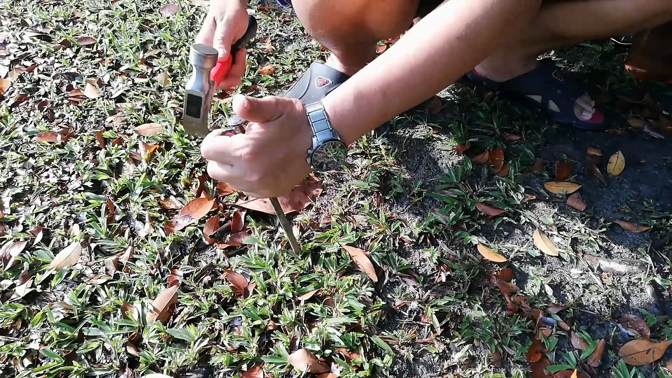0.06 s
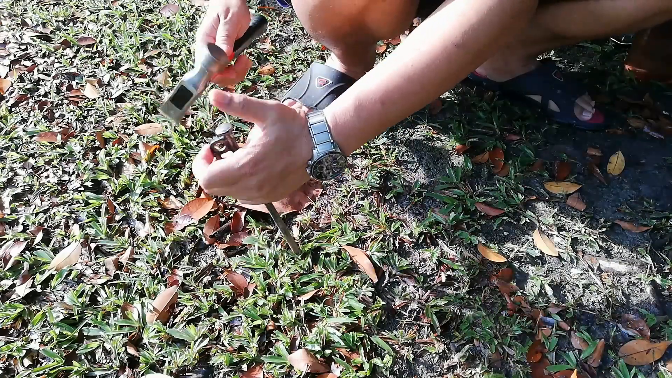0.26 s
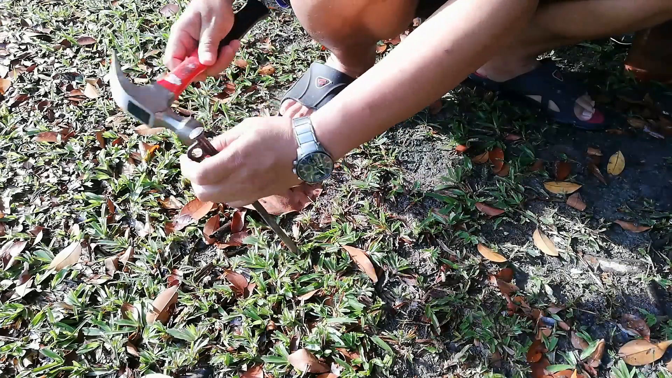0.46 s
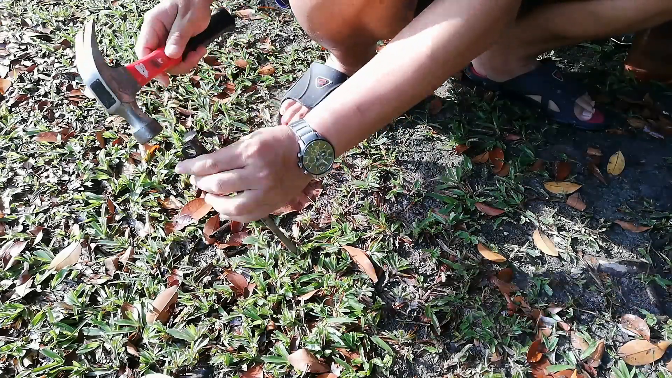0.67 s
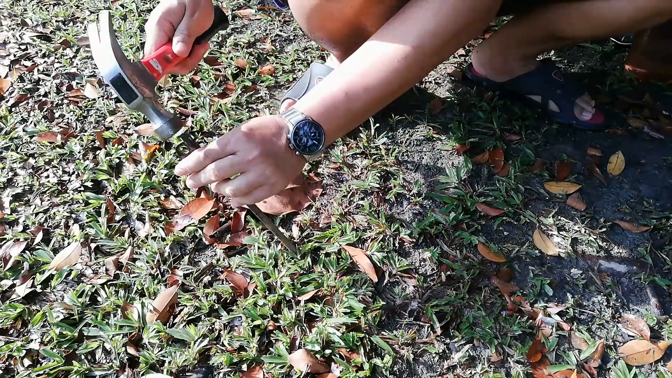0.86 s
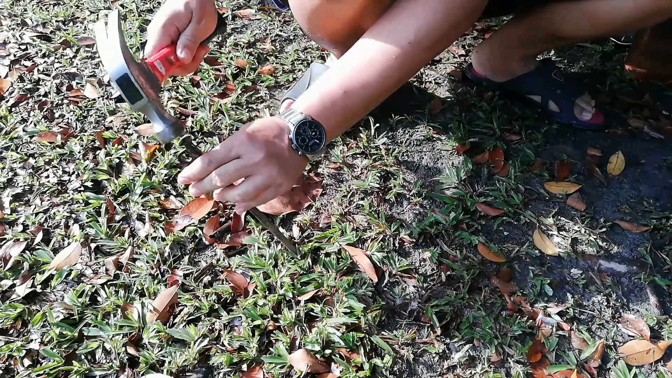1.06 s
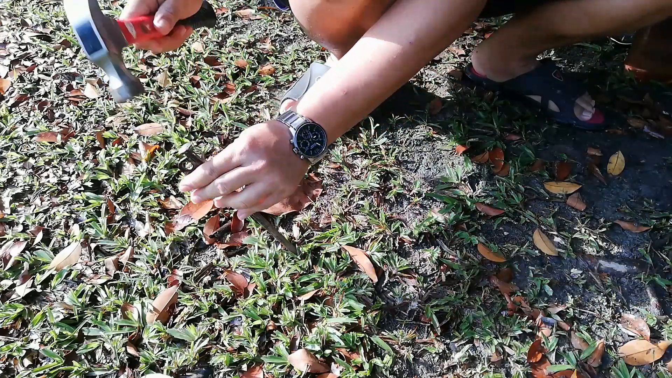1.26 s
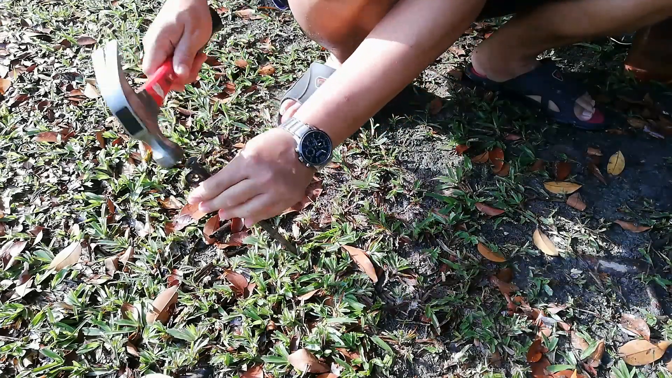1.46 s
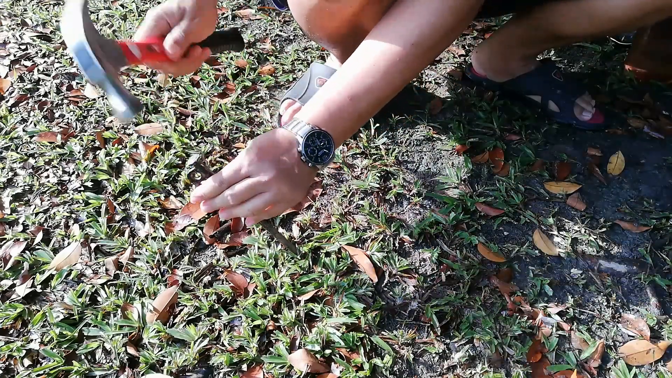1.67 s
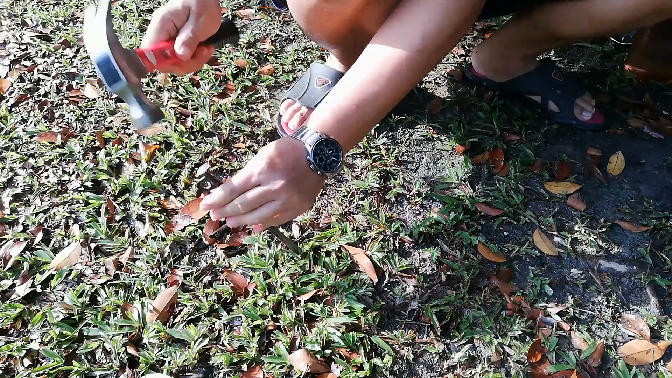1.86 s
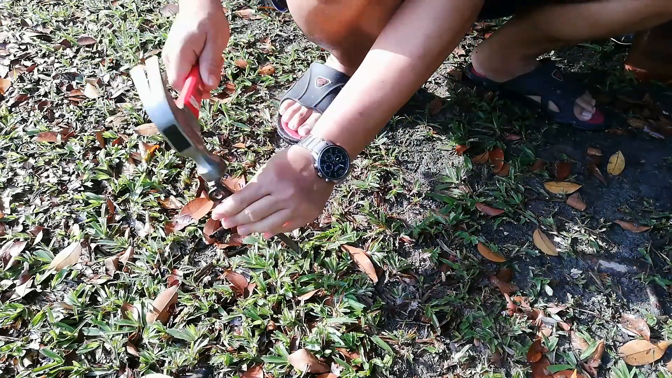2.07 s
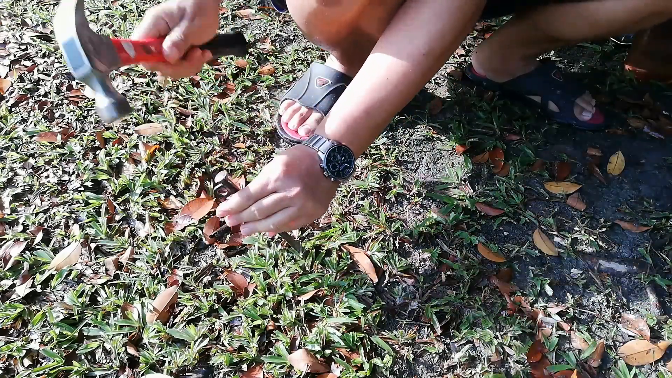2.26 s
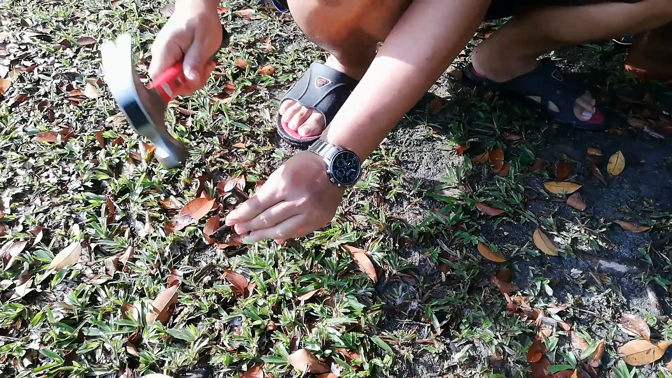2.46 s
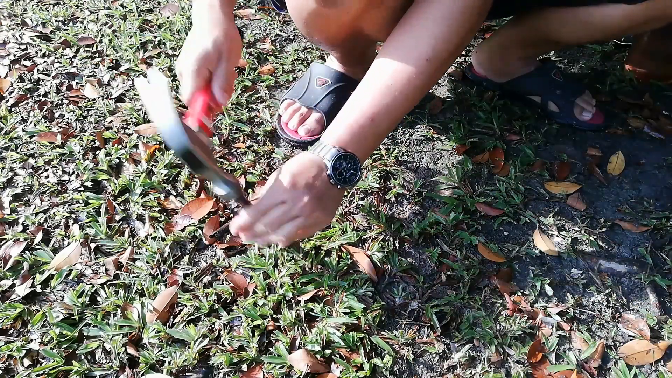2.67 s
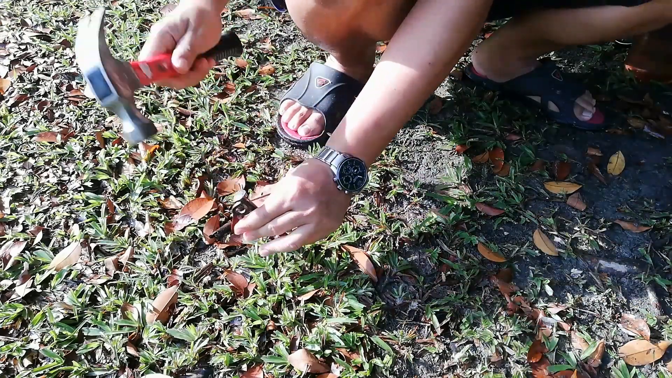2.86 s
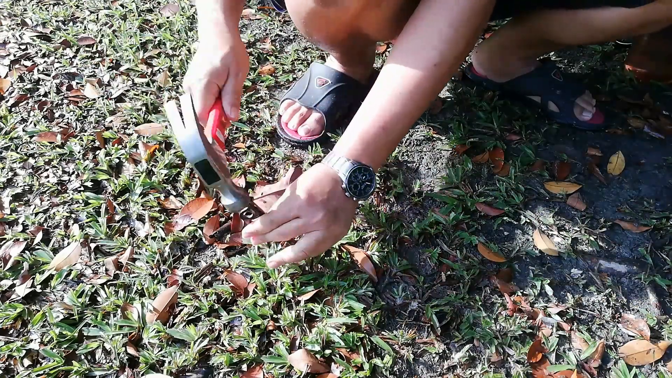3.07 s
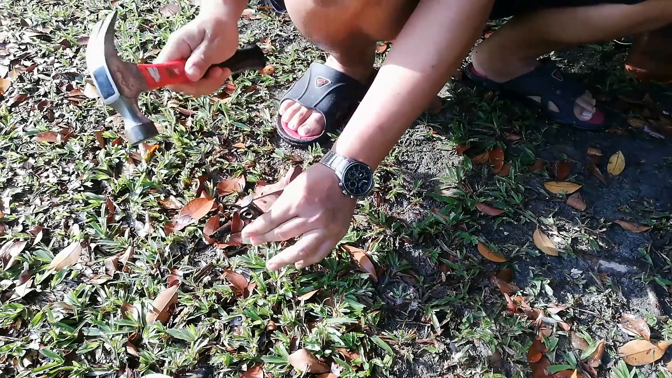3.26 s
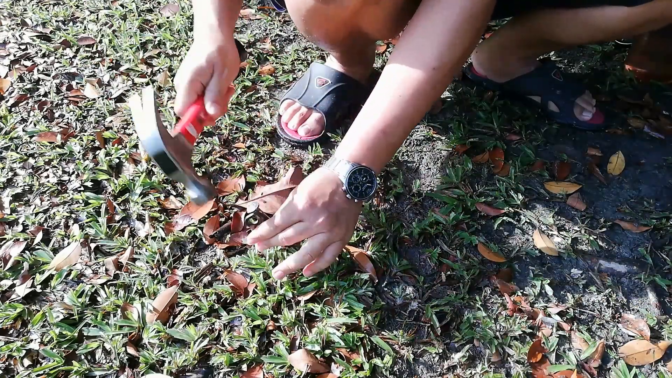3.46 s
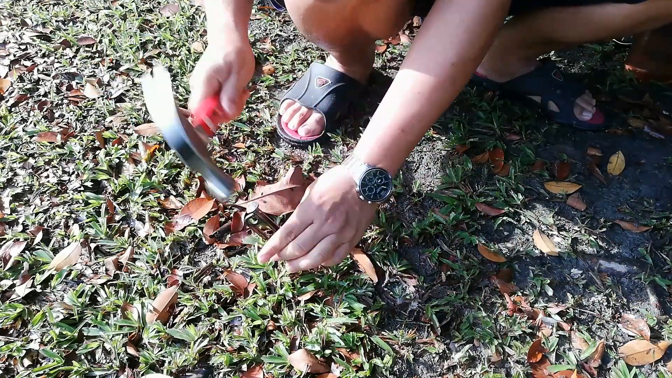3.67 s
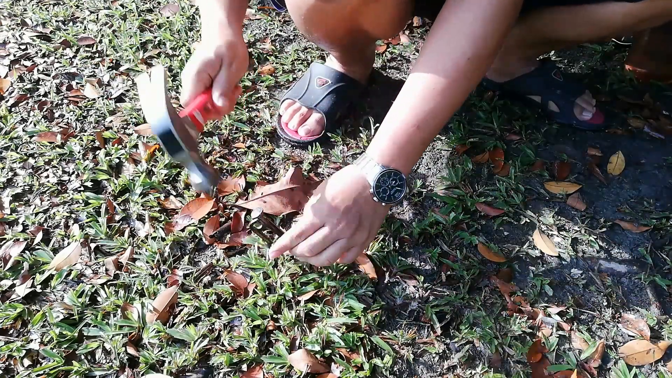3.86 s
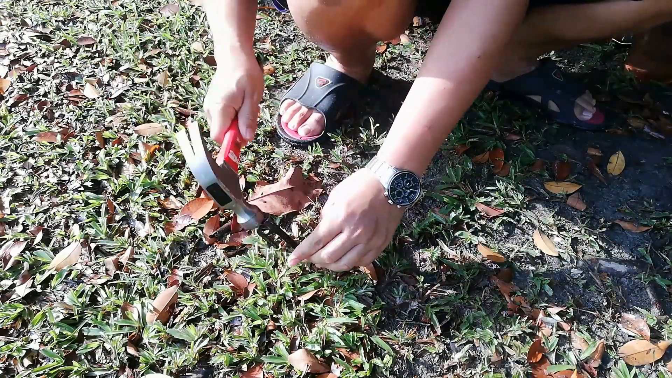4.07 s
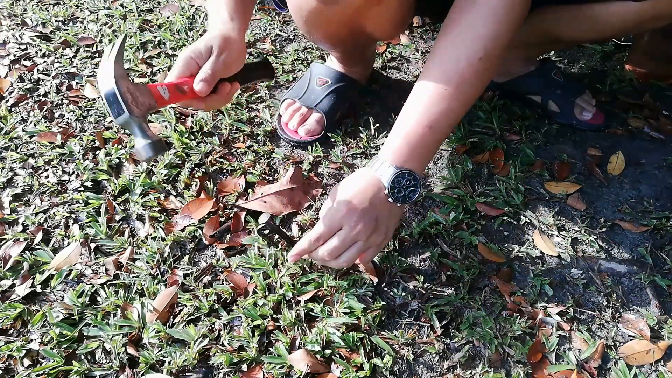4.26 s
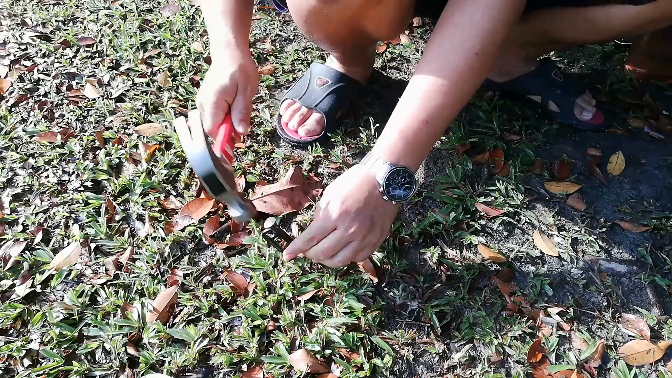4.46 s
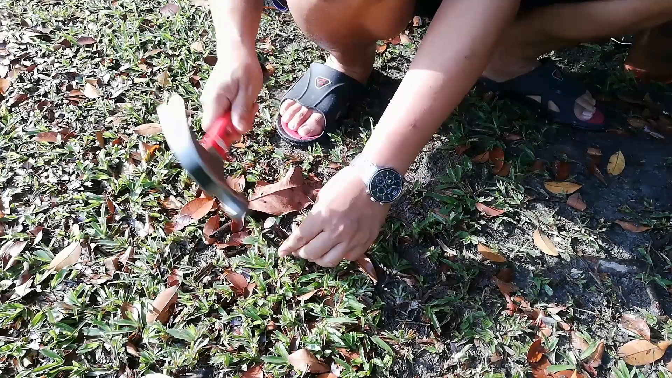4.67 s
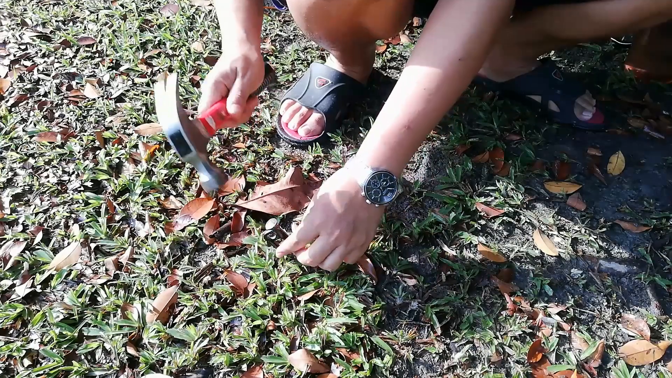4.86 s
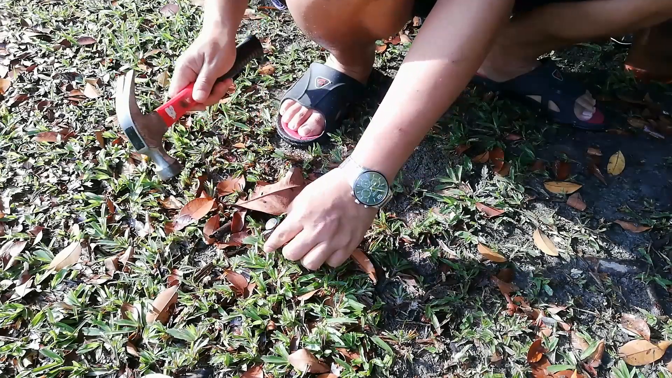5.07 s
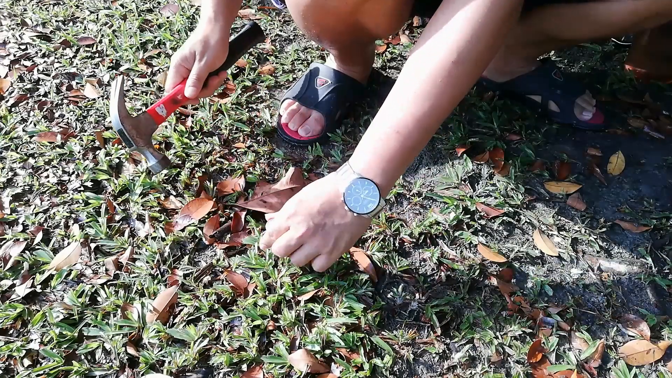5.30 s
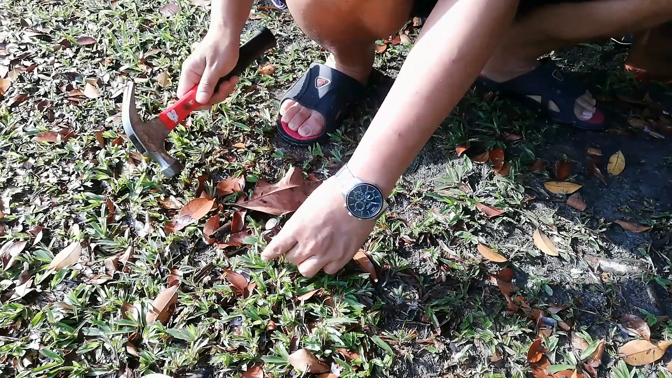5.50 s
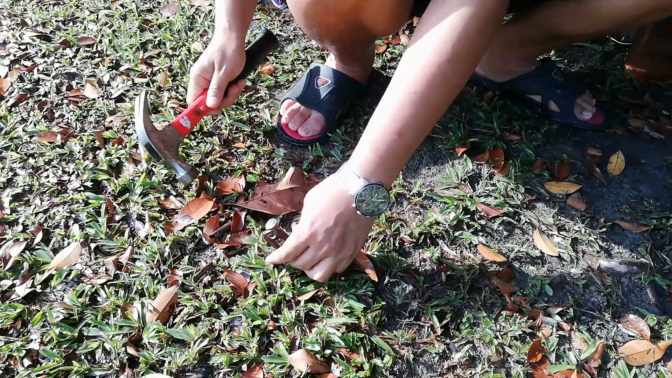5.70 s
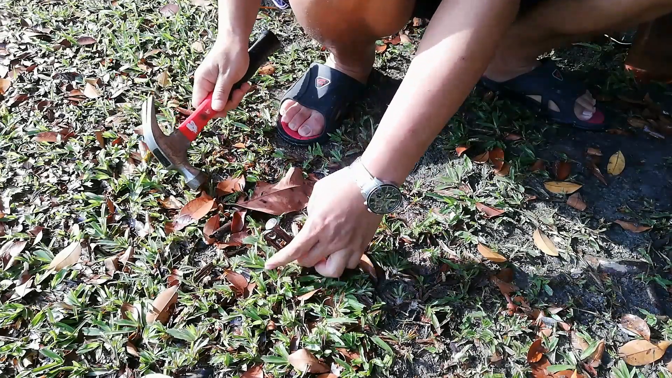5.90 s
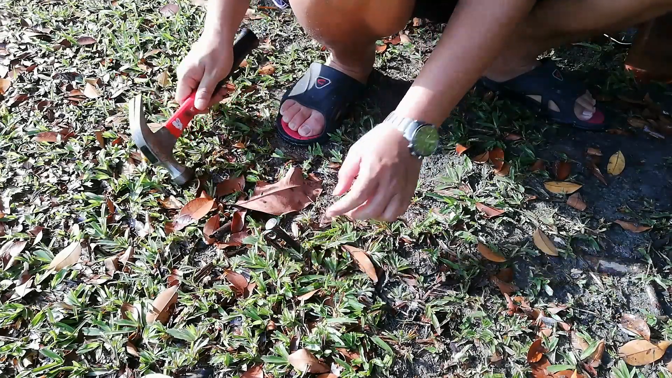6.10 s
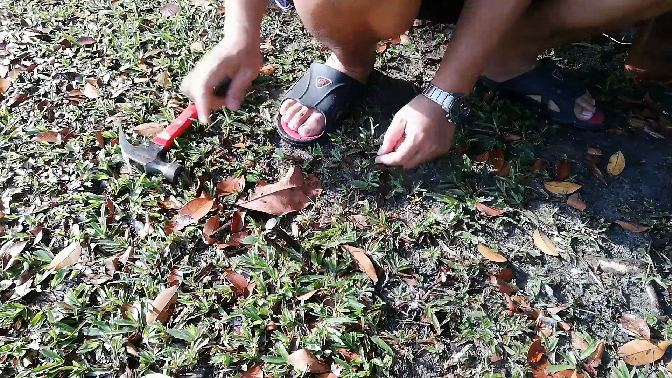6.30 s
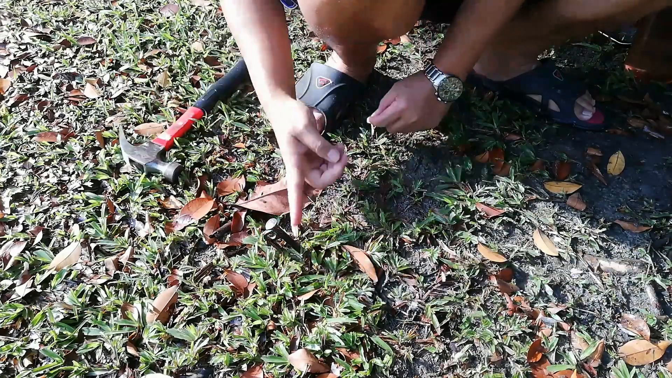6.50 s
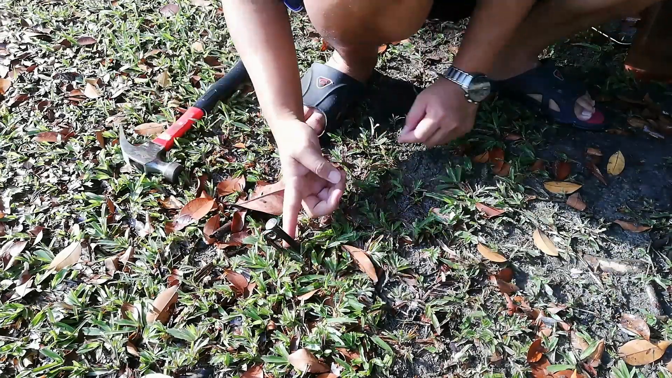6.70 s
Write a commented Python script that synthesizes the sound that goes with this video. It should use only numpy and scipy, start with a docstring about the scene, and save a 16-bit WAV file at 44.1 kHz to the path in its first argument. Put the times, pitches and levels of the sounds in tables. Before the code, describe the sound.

On an open lawn, a faint distant engine hum, soft birds and thin high hiss come first. Close by, a hammer gives a metal stake two light taps, then eleven loud, steady, piercing clinks, each with a short ring and open-air scatter. After a brief pause, the hammer is laid down with a soft dry crackle of grass. Close stereo pickup, with loud hits squashed.

```python
"""Open lawn, heard by two microphones: first a distant engine hums under faint birds and a high hiss of air.
Close by, a claw hammer then drives a thin steel tent stake into the soil: two light taps (a short glide rings
with the first), eleven full blows. Each is a noise crack with decaying sine modes; soil damps the stake, the
hammer head sings on, near ground and far trees scatter the clink, and the camera's limiter ducks loud blows.
Last, the hammer is laid in the grass, a crackle of clumped noise grains."""
import sys
import numpy as np
from scipy import signal
from scipy.fft import rfft, irfft, next_fast_len
from scipy.io import wavfile
from scipy.ndimage import uniform_filter1d, map_coordinates

SR = 44100
rng = np.random.default_rng(int(sys.argv[2]) if len(sys.argv) > 2 else 0)


def transcribe(u):
    """Save the signal u as a 16-bit wav file named by the first command-line argument.

    u: samples, shape (n,) or (channels, n), limited to [-1, 1]; the rate is SR.
    q: integer samples, one column per channel.
    """
    v = np.clip(np.atleast_2d(u).T, -1, 1)
    q = np.round(v * 32767).astype(np.int16)
    wavfile.write(sys.argv[1], SR, q)


N = 297316  # length [samples]

# Close: hammer blows; where the face lands decides what rings:
# (time [s], strength [dB], hammer head relative level [dB], stake's bright modes relative level [dB])
HAMMER_BLOWS = [(0.8876, -19, -7, -20), (1.0737, -12.5, -2, -10), (1.3681, -3, -2.5, -4),
                (1.6771, -1, -4.5, -4.5), (2.0031, 1, 4, -1.5), (2.33, 3.5, -5, 4.5), (2.6701, 1.5, 0, -3),
                (3.016, 0, -18, 2.5), (3.3464, -0.5, 3, 4.5), (3.6798, -0.5, 3, -0.5), (4.0178, -2, 1.5, 6),
                (4.3611, 0, 2.5, 4.5), (4.681, -5, -1.5, 4.5)]
# Steel on steel, spectrum of the crack: (frequency [Hz], relative level [dB])
CRACK_SPECTRUM = [(250, -18.5), (600, -22), (1000, -16.5), (1400, -13), (2700, -12), (4500, -3), (6600, -3),
                  (8200, 1.5), (9900, 3.5), (10800, -7.5), (12200, -9.5), (13300, -17.5), (15300, -7),
                  (16500, -21.5)]
# Stake modes damped by the soil, before its later grip: (frequency [Hz], relative level [dB], t60 [s])
STAKE_MODES = [(3470, -22.5, 0.06), (4300, -7.5, 0.064), (4730, -18.5, 0.036), (5420, -15, 0.0084),
               (7920, -5, 0.049), (8050, -15.5, 0.015), (8434, 0, 0.038), (9850, -3, 0.044),
               (11700, -21, 0.031), (12170, -16.5, 0.05), (13740, -21.5, 0.023)]
# The stake's low bending modes, retuned at every blow: (mean frequency [Hz], relative level [dB], t60 [s])
BENDING_MODES = [(1398, -20.5, 0.078), (1769, -21.5, 0.075), (2295, -21, 0.046)]
# The stake's brightest modes, which carry farthest: (frequency [Hz], relative level [dB], t60 [s])
BRIGHT_MODES = [(5468, 0, 0.04), (7680, 0, 0.05), (9700, -14.5, 0.018)]
# Balance of the clink between the two microphones: (frequency [Hz], left minus right [dB])
CLINK_LEAN = [(2500, 0.5), (4500, 2.5), (8000, 1), (12500, -9.0)]
# Scatter from the ground and plants near by: (frequency [Hz], t60 [s])
NEAR_DECAY = [(300, 0.046), (1500, 0.13), (4000, 0.25), (8000, 0.28), (15000, 0.24)]
# Scatter from trees farther off: (frequency [Hz], t60 [s])
FAR_DECAY = [(5500, 0.59), (7700, 0.61), (10000, 0.3)]
# Hammer settling in the grass: (time [s], level before the soft onset and decay [dB], t60 [s])
GRASS_RUSTLES = [(6.19, -42.5, 0.28), (6.213, -32, 0.14), (6.239, -41, 0.18), (6.281, -51, 1.0)]
# Colour of the grass crackle: (frequency [Hz], relative level [dB])
GRASS_SPECTRUM = [(300, -20), (1200, -7), (2800, 1.5), (4200, -3.5), (6000, -2), (9000, 0), (12000, -4.5),
                  (16000, -10)]
# Short glides: distant bird chirps, but at 0.891 s the stake's short ring near 4.4 kHz at the first light tap:
# (time [s], length [s], start frequency [Hz], end frequency [Hz], relative level [dB])
SHORT_GLIDES = [(.322, 0.028, 4980, 3580, -57), (0.672, 0.045, 4300, 3850, -65),
                (0.789, 0.054, 4110, 4130, -58), (0.891, 0.029, 4550, 4400, -44),
                (0.952, 0.033, 4600, 3440, -54), (4.957, 0.033, 4500, 3300, -59),
                (5.307, 0.027, 3520, 4780, -55.5), (5.494, 0.034, 3600, 4800, -60.5),
                (5.62, 0.033, 4200, 4630, -62)]
# Long far-off trills: (time [s], length [s], centre frequency [Hz], level [dB])
BIRD_TRILLS = [(0, 0.37, 2880, -57.5), (0, 0.4, 2020, -60), (1.384, 0.3, 2910, -59),
               (5.466, 0.45, 3060, -61), (5.551, 0.4, 2600, -63.5)]
# Distant engine's hum lines: (frequency [Hz], level before wavering [dB])
ENGINE_LINES = [(27, -59.5), (54, -57.5), (91.5, -49.5), (183, -57.5), (277, -66)]
# The engine's higher whine: (time [s], level before wavering [dB])
ENGINE_WHINE = [(0, -71), (4.7, -70.5), (5.4, -68.5), (6.74, -62.5)]
# Colour of the low rumble: (frequency [Hz], relative level [dB])
RUMBLE_SPECTRUM = [(15, -5), (30, -1.5), (80, 5), (140, -2), (210, -6.5), (300, -15.5), (450, -18.5),
                   (900, -55)]
# Rumble over time: (time [s], level before wavering [dB])
RUMBLE_COURSE = [(0, -48.5), (2.8, -47), (5.9, -45.5), (6.74, -47)]
# Colour of the light breeze: (frequency [Hz], relative level [dB])
BREEZE_SPECTRUM = [(200, 8), (480, -7.5), (640, 3.5), (1050, 1.5), (1350, 1.5), (1700, -4), (2050, -0.5),
                   (2500, -7), (3100, -4), (4300, -10.5), (6000, -19.5), (9000, -21), (15000, -41)]
# Breeze over time: (time [s], level before wavering [dB])
BREEZE_COURSE = [(0, -49), (3.3, -50.5), (4.6, -47.5), (5.2, -50), (6.25, -45.5), (6.74, -51)]
# Colour of the high, insect-like hiss: (frequency [Hz], relative level [dB])
HISS_SPECTRUM = [(3000, -40), (7600, -21), (8700, -1), (9600, -1), (10500, 5.5), (11200, 2.5), (11700, -9),
                 (12600, -30), (15500, -42)]
# Outdoor noise at the two microphones: (frequency [Hz], left-right likeness [-1 to 1])
OUTDOOR_LIKENESS = [(60, 0.98), (130, 0.92), (290, 0.51), (640, -0.8), (1410, -0.24), (3100, -0.28),
                    (6820, 0.14), (15000, 0.018)]
# Balance of the outdoor noise: (frequency [Hz], left minus right [dB])
OUTDOOR_LEAN = [(200, 0.5), (380, 1), (700, -9.5), (1290, -2), (4400, -1.5), (8120, 0), (15000, -20.5)]

# The hammer head's own clear note
HEAD_HZ, HEAD_DB, HEAD_T60_S = 5816, -19, 0.25
# The crack, and what the surroundings return
CRACK_DB, CRACK_NEAR_DB, STAKE_NEAR_DB, FAR_DB = 1.07, -12.5, -17.5, -26
CHATTER_S, CHATTER_DOUBLES_DB = 0.0079, 12  # contact time of a 0 dB blow; it doubles with this much strength
GRIP_S, ATTACK_S = 0.018, 0.0046  # time scale of the soil's grip; t60 of the onset's approach to full level
SINK_BLOWS = 3.7  # the stake's free length shrinks by a factor e in this many blows
# Colour by depth: (level with no free length [dB], change at full free length [dB])
KNOCK_DB, LOW_MODES_DB, TREBLE_DB = (2, -4.5), (-3, 5.5), (1.4, 6.5)
TOP_HZ = 15800  # the camera's band limit


def hammering():
    """Each blow sets stake and hammer head ringing; the colour shifts as the stake sinks."""
    out = np.zeros((2, N))
    t = np.arange(SR // 2) / SR
    for blow, (s, db, head_db, bright_db) in enumerate(HAMMER_BLOWS):
        crack = face_crack(t, db)
        bright = amp(bright_db) * ring(BRIGHT_MODES, t, detune=0.0032, scatter_db=2.5)
        stake = stake_ring(t, bright)
        near = scattered(amp(CRACK_NEAR_DB) * crack + amp(STAKE_NEAR_DB) * stake, NEAR_DECAY)
        far = amp(FAR_DB) * scattered(bright, FAR_DECAY)
        clink = sinking_colour(crack + stake + near + far, blow)
        onset = 1 - fade(t, ATTACK_S)
        add(out, s, amp(db) * (clink + head_note(t, head_db)) * onset)
    return out


def face_crack(t, strength_db):
    """The face chatters on the stake: rough noise that lasts longer for a harder blow."""
    chatter = CHATTER_S * 2 ** (strength_db / CHATTER_DOUBLES_DB)
    roughness = amp(1.9 * wobble(890, size=len(t)))
    contact = np.exp(-(t / chatter) ** 1.23) * roughness
    return amp(CRACK_DB) * contact * noise(CRACK_SPECTRUM, len(t))


def stake_ring(t, bright):
    """Bright, soil-damped and bending modes of the steel, quenched together by the soil."""
    damped = ring(STAKE_MODES, t, detune=0.0046, scatter_db=5.0)
    bending = ring(BENDING_MODES, t, detune=0.067, scatter_db=4.5)
    # the soil grips again once the stake stops sliding
    grip = 0.25 + 0.57 * np.exp(-(t / GRIP_S) ** 2)
    return (bright + damped + bending) * grip


def head_note(t, head_db):
    """The hammer head sings one decaying note, a little out of step at the two microphones."""
    phase = np.array([[0], [1.2]])  # left, right [rad]
    return amp(HEAD_DB + head_db) * fade(t, HEAD_T60_S) * np.sin(2 * np.pi * HEAD_HZ * t + phase)


def sinking_colour(clink, blow):
    """A deeper stake, with less free length, knocks more and tinkles less."""
    free = np.exp(-blow / SINK_BLOWS)
    knock_db, low_db, treble_db = [sunk + free * more for sunk, more in (KNOCK_DB, LOW_MODES_DB, TREBLE_DB)]
    colour = [(2500, knock_db), (3300, 0), (4250, low_db), (5300, 0),
              (10000, 0), (11800, treble_db), (14000, 0)]  # (frequency [Hz], gain [dB])
    return filtered(clink, lambda hz: amp(along(colour, hz)) * balance(CLINK_LEAN, hz))


def ring(modes, t, detune, scatter_db):
    """Damped modes, struck at new strengths and reaching the two microphones out of step."""
    hz, db, t60 = np.transpose(modes)[:, :, None]
    hz = hz * (1 + detune * rng.standard_normal(hz.shape))
    gain = amp(db + scatter_db * rng.standard_normal((2, *hz.shape)))
    phase = 2 * np.pi * rng.random(hz.shape) + 1.52 * rng.standard_normal(gain.shape)
    return np.sum(gain * fade(t, t60) * np.sin(2 * np.pi * hz * t + phase), axis=1)


def scattered(x, decay):
    """The surroundings return a dense tail; each frequency dies at its own speed."""
    hz, t, z = signal.stft(rng.standard_normal((2, SR // 2)), SR, nperseg=256)
    t60 = along(decay, hz)[:, None]
    tail = signal.istft(z * fade(t, t60), SR, nperseg=256)[1]
    tail = tail / np.linalg.norm(tail[0])
    return signal.fftconvolve(x, tail, axes=1)[:, :x.shape[1]]


def grass():
    """Blades and dry leaves crackle under the hammer as it is put down."""
    out = np.zeros((2, N))
    t = np.arange(SR // 2) / SR
    for s, db, t60 in GRASS_RUSTLES:
        # tiny snaps that come in clumps
        snaps_db = 3.1 * wobble(722, size=len(t))
        clumps_db = 2.1 * wobble(86, size=len(t))
        grains = unit(amp(snaps_db + clumps_db))
        envelope = fade(t, t60) * (1 - fade(t, 0.021))
        add(out, s, amp(db) * envelope * grains * noise(GRASS_SPECTRUM, len(t)))
    return out


def short_glides():
    """Bird chirps and one short stake ring: raspy gliding tones, blurred by scatter from ground and plants."""
    out = np.zeros((2, N))
    for s, length, start_hz, end_hz, db in SHORT_GLIDES:
        pitch = np.linspace(start_hz, end_hz, int(length * SR))
        pitch = pitch * (1 + 0.048 * wobble(922, size=len(pitch)))  # a raspy tone
        glide = np.hanning(len(pitch)) * np.sin(2 * np.pi * np.cumsum(pitch) / SR)
        glide = np.pad(glide, (0, SR // 4))[None]  # room for the scattered tail
        add(out, s, amp(db + 4.0) * (glide + scattered(glide, NEAR_DECAY)))
    return out


def bird_trills():
    """Long far-off trills merge into soft-edged noise in a narrow band around the bird's pitch."""
    out = np.zeros((2, N))
    for s, length, hz, db in BIRD_TRILLS:
        size = int(length * SR)
        band = [(hz * .7, -70), (hz * .92, -6), (hz, 0), (hz * 1.1, -6), (hz * 1.4, -70)]
        add(out, s, amp(db) * signal.windows.tukey(size, .25) * noise(band, size))
    return out


def outdoors():
    """The background adds engine, low rumble, light breeze and a steady high hiss like that of insects."""
    rumble = amp(course(RUMBLE_COURSE) + 1.3 * wobble(8)) * spread(RUMBLE_SPECTRUM)
    breeze = amp(course(BREEZE_COURSE) + 1.19 * wobble(6)) * spread(BREEZE_SPECTRUM)
    hiss = amp(-51.0) * spread(HISS_SPECTRUM)
    return engine() + rumble + breeze + hiss


def engine():
    """A distant engine hums on steady lines and a whine, each wavering in level and phase."""
    t = np.arange(N) / SR
    hum = np.zeros(N)
    for hz, db in list(ENGINE_LINES) + [(613, course(ENGINE_WHINE))]:
        level = amp(db + 1.57 * wobble(4.006)) * np.sqrt(2)  # rms to peak
        hum += level * np.sin(2 * np.pi * hz * t + 0.62 * wobble(7))
    return hum


def spread(spectrum):
    """Outdoor noise of rms 1: alike in the bass, wide above."""
    def mid_side(hz):
        turn = np.arccos(np.clip(along(OUTDOOR_LIKENESS, hz), -1, 1)) / 2
        return np.array([np.cos(turn), np.sin(turn)])

    mid, side = filtered(noise(spectrum, N), mid_side)
    pair = np.array([mid + side, mid - side])
    return unit(filtered(pair, lambda hz: balance(OUTDOOR_LEAN, hz)))


def course(points):
    """A level in dB drawn through (time, level) points over the whole scene."""
    return np.interp(np.arange(N) / SR, *np.transpose(points))


def balance(lean, hz):
    """Left and right gains, half of the lean to each side."""
    return amp(along(lean, hz) * np.array([[.5], [-.5]]))


def amp(db):
    """Decibels to gain."""
    return 10 ** (np.asarray(db) / 20)


def unit(x):
    """Scale to rms 1."""
    return x / np.sqrt(np.mean(x ** 2) + 1e-20)


def along(points, hz):
    """(frequency, value) points read on a log frequency axis."""
    f, v = np.transpose(points)
    return np.interp(np.log(hz + 1), np.log(f + 1), v)


def fade(t, t60):
    """Exponential decay by 60 dB in t60."""
    return np.exp(-np.log(1000) * t / t60)


def wobble(rate, size=N):
    """A smooth random curve, rate knots a second."""
    knots = rng.standard_normal(int(size * rate / SR) + 4)
    return map_coordinates(knots, [np.arange(size) * rate / SR])


def filtered(x, response):
    """x times a response of frequency."""
    n = x.shape[-1]
    m = next_fast_len(n + SR // 8)
    return irfft(rfft(x, m) * response(np.fft.rfftfreq(m, 1 / SR)), m)[..., :n]


def noise(spectrum, size):
    """Coloured noise of rms 1, unrelated left and right."""
    white = rng.standard_normal((2, size))
    return unit(filtered(white, lambda hz: amp(along(spectrum, hz))))


def add(track, s, sound):
    """Mix a sound into the track at s seconds."""
    part = track[:, round(s * SR):][:, :sound.shape[-1]]
    part += sound[..., :part.shape[-1]]


def scene():
    """Everything that reaches the two microphones."""
    return hammering() + grass() + short_glides() + bird_trills() + outdoors()


def limiter(x, ceiling_db, hold_s, release_s):
    """Gain drops at once when the short-term level passes the ceiling, holds, then creeps back."""
    block = SR // 1000  # about 1 ms
    power = np.pad((x ** 2).mean(0), (0, -N % block)).reshape(-1, block).mean(1)
    level_db = 10 * np.log10(abs(uniform_filter1d(power, size=4)) + 1e-12)
    over = np.maximum(level_db - ceiling_db, 0)
    age = np.arange(SR // block) * block / SR
    memory = np.exp(-np.maximum(age - hold_s, 0) / release_s)
    history = np.lib.stride_tricks.sliding_window_view(np.pad(over, (len(age) - 1, 0)), len(age))
    cut_db = (history * memory[::-1]).max(1)  # the strongest remembered excess rules
    return x * amp(-np.interp(np.arange(N), np.arange(len(cut_db)) * block, cut_db))


def record(dry):
    """The camera limits the level, rounds the peaks and cuts steeply above its band limit."""
    held = limiter(dry, ceiling_db=-8.5, hold_s=0.096, release_s=0.084)
    rounded = held / (1 + held ** 8) ** (1 / 8)
    return filtered(rounded, lambda hz: 1 / (1 + (hz / TOP_HZ) ** 160))


dry = scene()
out = record(dry)
transcribe(out)
```